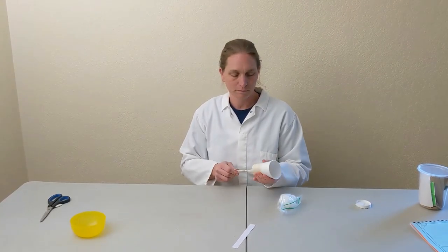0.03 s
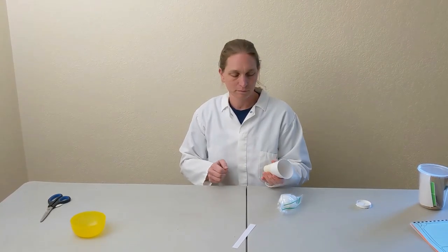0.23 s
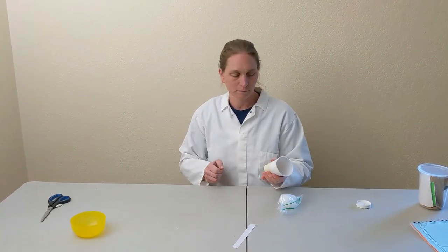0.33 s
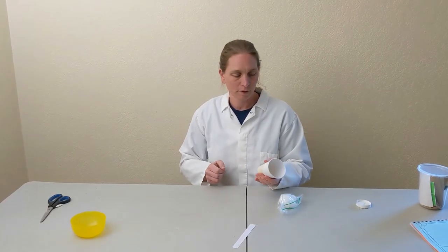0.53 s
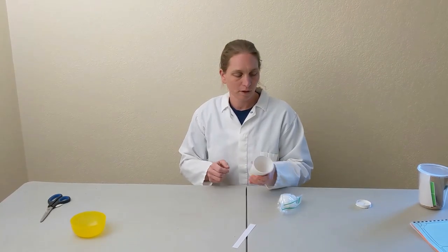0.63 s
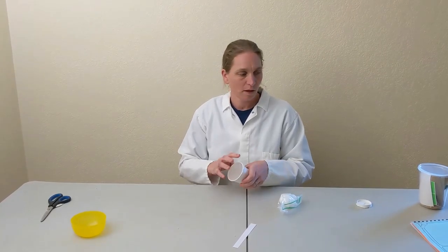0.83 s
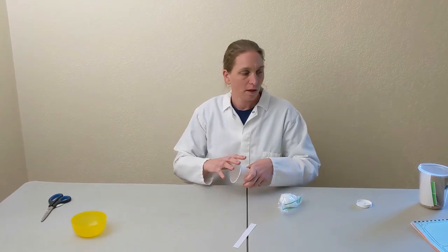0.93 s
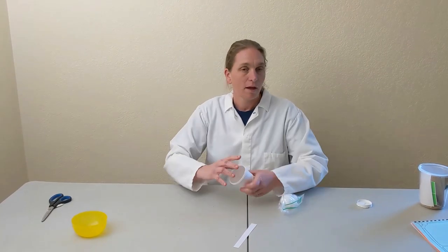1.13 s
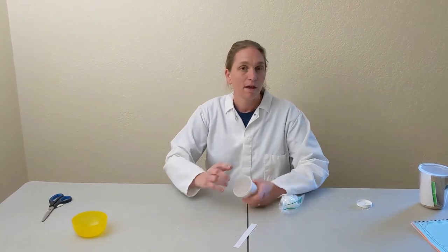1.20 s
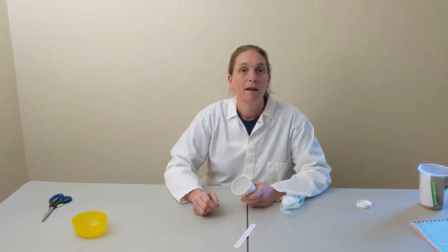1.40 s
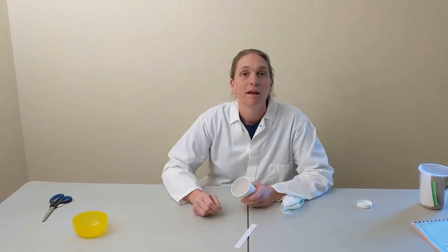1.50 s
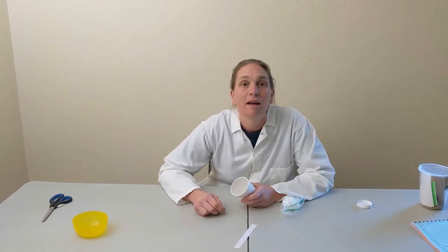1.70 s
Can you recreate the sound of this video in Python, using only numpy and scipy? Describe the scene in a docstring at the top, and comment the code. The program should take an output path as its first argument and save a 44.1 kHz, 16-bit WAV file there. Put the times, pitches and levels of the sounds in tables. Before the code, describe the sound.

A stretched balloon snaps sharply against a cup, then arms knock down on a table.

```python
"""A balloon stretched over a cup, pulled back and let go: the rubber creaks, slips, slaps and rings the cup.
Fingers tick on the cup; then forearms land on a folding table, which knocks and judders, and sleeves slide.
The place is a bare room with a faint low hum. The stereo microphones stand far enough off
to hear more of the walls than of the direct snap."""
import sys
import numpy as np
from scipy import signal
from scipy.fft import rfft, irfft, next_fast_len
from scipy.io import wavfile
from scipy.ndimage import uniform_filter1d

SR = 44100
rng = np.random.default_rng(int(sys.argv[2]) if len(sys.argv) > 2 else 0)


def bounce(signal):
    """Save signal as a 16-bit WAV file at the path given by the first command-line argument."""
    frames = np.transpose(np.atleast_2d(signal))
    limited = np.clip(frames, -1, 1)
    pcm = np.round(limited * 32767).astype(np.int16)
    wavfile.write(sys.argv[1], SR, pcm)


N = 77175
T = np.arange(N) / SR

SNAP_S, SNAP_RISE_S = .2403, .00088  # the rubber slaps the cup
# Modes of the cup and its rubber skin. Each row: pitch in Hz, relative level in dB, t60 in seconds.
CUP_MODES = [(557, -2.5, 0.068), (663, -14.5, .04), (738, -11, 0.12), (878, -20, 0.18), (1015, -2.5, .06),
             (1202, 3.5, .06), (1317, -5.5, 0.033), (1580, -18.5, 0.16), (1892, -29, 0.057),
             (1980, -12, 0.086), (2472, -8, .025), (2663, -11, .03), (4040, -24, .02)]
# Air pushed out of the cup's mouth. Each row: pitch in Hz, level in dB, t60 in seconds.
PUFF_MODES = [(108, -34, .1), (664, -5.5, 0.021)]
# The rubber's crack. Each row: frequency in Hz, relative level in dB.
CRACK_COLOUR = [(60, -18), (170, -21.5), (250, -11), (340, 1.5), (450, -6), (850, 0), (1200, 6.5),
                (1650, -1.5), (2600, -7.5), (3800, -7.5), (5500, -14.5), (7500, -19.5), (12000, -20.5),
                (16000, -33)]
# Rubber rubbing in the fingers during the pull. Each row: time in seconds, level in dB.
PULL_LEVELS = [(0, -70.5), (.05, -63), (.11, -60), (.17, -61), (.21, -75.5), (.235, -51.5), (.245, -87.5)]
# The tone of that rubbing. Each row: frequency in Hz, relative level in dB.
PULL_COLOUR = [(200, -1), (450, -11), (650, -2), (900, -3.5), (1170, 4.5), (1400, -7), (3100, -22.5),
               (4400, -18), (6500, -31), (15000, -34)]
# Squeaks of the stretching rubber. Each row: start in seconds, centre in Hz, level in dB.
RUBBER_SQUEAKS = [(0.107, 4190, -50.5), (0.146, 4973, -54)]

# Fingers and table ticking against the cup.
# Each row: start in seconds, direct peak in dB, centre in Hz, width in octaves.
CUP_TICKS = [(.685, -37.5, 11150, 2.9), (0.7684, -43, 6500, 1.4), (0.8049, -23.5, 9900, 0.31),
             (0.979, -31, 3430, .5), (1.424, -25, 2600, 0.93)]
# The broad skirt under every tick's band. Each row: frequency in Hz, relative level in dB.
SKIRT_COLOUR = [(200, 0.5), (1200, -1), (2800, 1.5), (4500, 2.5), (6500, 2), (12500, -10.5), (16000, -14)]

# Arms and cup landing on the table. Each row: start in seconds, thud in dB, clack in dB.
LANDINGS = [(1.312, -40, -52.5), (1.353, -49.5, -42.5), (1.407, -41, -68), (1.4248, -41, -31),
            (1.443, -38, -77), (1.4775, -43, -47), (1.525, -46.5, -56)]
# The dull part of a landing. Each row: frequency in Hz, relative level in dB.
THUD_COLOUR = [(25, -8.5), (70, -7.5), (130, -5.5), (230, 1), (320, -5), (460, -7.5), (600, -6.5),
               (950, -19.5), (2000, -20), (8000, -42.5)]
# The hard part of a landing. Each row: frequency in Hz, relative level in dB.
CLACK_COLOUR = [(200, -2), (1100, 6.5), (1700, -6), (2600, 5.5), (3800, -18.5), (6500, -18), (11000, -20),
                (16000, -26)]
# Modes of the table top. Each row: pitch in Hz, relative level in dB, t60 in seconds.
TABLE_MODES = [(31, -17, .4), (79.9, -6, 0.15), (143, -0.5, 0.064), (224.3, -5, 0.066)]

# Sleeves and hands sliding on the table. Each row: start in seconds, hiss in dB, rise in seconds,
# t60 in seconds, hiss centre in Hz, width in octaves, rumble in dB.
SLEEVE_SLIDES = [(1.295, -52.5, 0.014, 0.18, 2100, .25, -74), (1.342, -45, 0.0096, 0.29, 2900, 0.7, -40),
                 (1.468, -53.5, .012, 0.3, 2460, 0.2, -39), (1.67, -48.5, 0.0095, .28, 11900, .3, -46)]
# The hiss of cloth. Each row: frequency in Hz, relative level in dB.
CLOTH_COLOUR = [(200, -9), (1000, -3.5), (1800, -0.5), (2800, -1.5), (5000, -8.5), (8000, -11.5),
                (12500, -12), (16000, -19)]
# The table top rumbling under a slide. Each row: frequency in Hz, relative level in dB.
RUMBLE_COLOUR = [(25, 3.5), (90, -1), (160, 1), (300, -9.5), (550, -5), (900, -31), (4000, -47)]

# Room tone. Each row: frequency in Hz, relative level in dB.
ROOM_TONE_COLOUR = [(20, -5.5), (65, 0), (130, -4.5), (220, -6.5), (450, -12), (1000, -14.5), (2000, -9.5),
                    (5000, -24), (9000, -23), (16000, -29.5)]
# How long the bare room rings. Each row: frequency in Hz, t60 in seconds.
ROOM_DECAY = [(80, .35), (160, 0.27), (300, 0.65), (700, 0.58), (1150, 0.67), (2500, 0.51), (4200, 0.62),
              (8000, 0.4), (15000, 0.29)]
# How alike the room sounds at the two microphones. Each row: frequency in Hz, correlation from -1 to 1.
MIC_LIKENESS = [(60, 0.87), (160, 0.94), (350, 0.61), (650, 0.7), (1100, -0.2), (2500, -0.0093),
                (8000, -0.12)]
# The colour difference between the microphones. Each row: frequency in Hz, left minus right in dB.
MIC_BALANCE = [(100, 0.6), (600, -1), (1200, -1), (2500, 0.5), (4500, 4), (8000, 1), (13000, -5)]


def balloon():
    """The rubber rubs while pulled, slips from the fingers and, just after, slaps the cup with a crack."""
    pull = amp(np.interp(T, *np.transpose(PULL_LEVELS))) * noise(PULL_COLOUR)
    slip = amp(-23) * burst(SNAP_S - .0028, SNAP_RISE_S, t60=.03) * noise([(500, 4), (15000, -16)])
    crack = amp(-11) * burst(SNAP_S + SNAP_RISE_S, rise=.0013, t60=.036) * noise(CRACK_COLOUR)
    # Summed over all directions the crack is smooth: the walls get one pulse of its colour and energy.
    impulse = signal.unit_impulse(N, round((SNAP_S + .003) * SR))
    pulse = unit(filtered(impulse, lambda hz: amp(along(CRACK_COLOUR, hz)))) * crack.std()
    return pull + slip + crack + amp(7.5) * echoes(pull + pulse)


def cup():
    """The slap rings the cup and pushes a puff of air from its mouth."""
    # Neighbouring modes swing in opposite directions, so the ring swells over its first cycles.
    modes = ring(CUP_MODES[1::2], SNAP_S, SNAP_RISE_S) - ring(CUP_MODES[::2], SNAP_S, SNAP_RISE_S)
    puff = -ring(PUFF_MODES, SNAP_S, SNAP_RISE_S)
    return in_room(amp(-13) * modes, wet_db=3.5) + in_room(puff, wet_db=-7)


def squeaks():
    """The tightening rubber creaks in narrow, high bands."""
    out = np.zeros(N)
    for start, centre, db in RUBBER_SQUEAKS:
        band = narrow_band(rng.standard_normal(N), centre, width_hz=250)
        out += amp(db) * burst(start, rise=.0029, t60=.037) * band
    return in_room(out, wet_db=-1)


def ticks():
    """Each tick on the cup is one sharp impulse with a little grit, in its own band."""
    out = np.zeros(N)
    for start, db, centre, width in CUP_TICKS:
        push = amp(-17.5) * burst(start, rise=.0001, t60=.012) * rng.standard_normal(N)
        push[round(start * SR)] += 1
        click = filtered(push, lambda hz: bell(hz, centre, width) + amp(along(SKIRT_COLOUR, hz) - 8))
        out += amp(db) * click / np.abs(click).max()
    return in_room(out, wet_db=7)


def table_knocks(rise_s=.0012):
    """Each landing on the table is a dull thud and a short clack; overlapping ones add in power."""
    thuds = [amp(db) * burst(start, rise_s, t60=.25) for start, db, _ in LANDINGS]
    clacks = [amp(db) * burst(start, rise_s, t60=.052) for start, _, db in LANDINGS]
    thud = np.linalg.norm(thuds, axis=0) * noise(THUD_COLOUR)
    clack = np.linalg.norm(clacks, axis=0) * noise(CLACK_COLOUR)
    return in_room(thud + clack, wet_db=5)


def table_judder(start_s=1.416, period_s=.0133, peak_s=1.441, width_s=.047):
    """An arm sticks and slips on the table; each of four jolts rings the top's low modes."""
    jolts = start_s + period_s * np.arange(4)
    sizes = amp(-24) * np.exp(-.5 * ((jolts - peak_s) / width_s) ** 2)
    top = sum(size * ring(TABLE_MODES, start, rise=.0017) for start, size in zip(jolts, sizes))
    return in_room(top, wet_db=-25.5)


def sleeves():
    """Cloth and skin brush over the table: a hiss lifted in its own band and a low rumble of the top."""
    out, cloth, rumble = np.zeros(N), noise(CLOTH_COLOUR), noise(RUMBLE_COLOUR)
    for start, hiss_db, rise, t60, centre, width, rumble_db in SLEEVE_SLIDES:
        hiss = unit(filtered(cloth, lambda hz: 1 + amp(1) * bell(hz, centre, width)))
        out += burst(start, rise, t60) * (amp(hiss_db) * hiss + amp(rumble_db) * rumble)
    return in_room(out, wet_db=5)


def in_room(x, wet_db):
    """At the microphones: the direct sound, dead centre, plus the walls' answer."""
    return x + amp(wet_db) * echoes(x)


def echoes(x, delay_s=.003):
    """Dense early echoes off table and wall, then a tail that dies soonest at the top and in the bass."""
    hz, t, spectra = signal.stft(diffuse(), SR, nperseg=256)
    decay = fade(t, along(ROOM_DECAY, hz)[:, None])
    tail = signal.istft(spectra * decay, SR, nperseg=256)[1][:, :N]
    early_lift = 1 + amp(-3) * fade(T, t60=.07)
    spectrum = rfft(tail * early_lift)
    local_power = np.abs(uniform_filter1d(np.abs(spectrum) ** 2, size=36))
    even_tail = irfft(spectrum / np.sqrt(local_power + 1e-12))[:, :SR]  # equal energy in every band
    response = np.pad(even_tail, ((0, 0), (round(delay_s * SR), 0)))
    return signal.fftconvolve(x[None], response, axes=1)[:, :N]


def room_tone():
    """Faint room noise from all round the microphones, with a wavering low hum."""
    air = unit(filtered(diffuse(), lambda hz: amp(along(ROOM_TONE_COLOUR, hz))))
    hum = narrow_band(diffuse(), centre_hz=136.5, width_hz=24)
    return amp(-61.5) * air + amp(-70) * hum


def diffuse():
    """White noise as the room brings it to the pair: alike in the bass, unrelated in the treble."""
    def mid_side_gains(hz):
        angle = np.arccos(np.clip(along(MIC_LIKENESS, hz), -1, 1)) / 2
        return np.array([np.cos(angle), np.sin(angle)])
    mid, side = filtered(rng.standard_normal((2, N)), mid_side_gains)
    return np.array([mid + side, mid - side])


def ring(modes, start, rise):
    """Damped modes struck at the start time."""
    return sum(amp(db) * burst(start, rise, t60) * np.sin(2 * np.pi * hz * (T - start))
               for hz, db, t60 in modes)


def burst(start, rise, t60):
    """An envelope that rises and dies away; all times in seconds."""
    t = np.maximum(T - start, 0)
    return (1 - np.exp(-t / rise)) * fade(t, t60)


def fade(t, t60):
    """Exponential decay, 60 dB down after t60 seconds."""
    return np.exp(-np.log(1000) * t / t60)


def noise(colour):
    """Noise of rms 1 with the given spectrum."""
    return unit(filtered(rng.standard_normal(N), lambda hz: amp(along(colour, hz))))


def narrow_band(x, centre_hz, width_hz):
    """One resonant band of x at rms 1, 6 dB down at width_hz either side."""
    return unit(filtered(x, lambda hz: 1 / (1 + ((hz - centre_hz) / width_hz) ** 2)))


def bell(hz, centre, width):
    """A smooth band, its width in octaves."""
    return np.exp(-.5 * (np.log2((hz + 1) / centre) / width) ** 2)


def filtered(x, response):
    """Shape x with a gain that depends on frequency."""
    size = next_fast_len(N + SR // 2)
    return irfft(rfft(x, size) * response(np.fft.rfftfreq(size, 1 / SR)), size)[..., :N]


def along(points, hz):
    """Read (Hz, value) points on a log axis."""
    frequencies, values = np.transpose(points)
    return np.interp(np.log(hz + 1), np.log(frequencies + 1), values)


def amp(db):
    """Decibels to gain."""
    return 10 ** (np.asarray(db) / 20)


def unit(x):
    """Scale to rms 1."""
    return x / np.sqrt(np.mean(x ** 2) + 1e-20)


def scene():
    """Everything that reaches the microphones, from the balloon down to the room tone."""
    snap = balloon() + cup() + squeaks()
    handling = ticks() + table_knocks() + table_judder() + sleeves()
    return snap + handling + room_tone()


def record(dry):
    """The two microphones differ a little in colour and keep nothing above their band limit."""
    def response(hz, top_hz=15900):
        balance = amp(np.outer([.5, -.5], along(MIC_BALANCE, hz)))
        return balance / np.sqrt(1 + (hz / top_hz) ** 200)
    return filtered(dry, response)


dry = scene()
out = record(dry)
bounce(out)
```